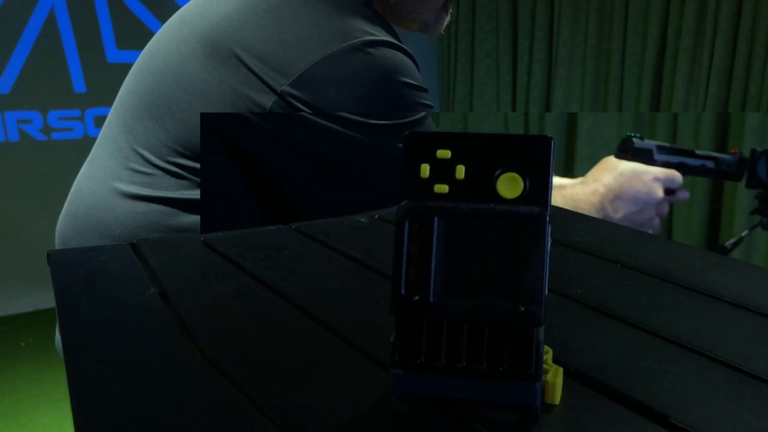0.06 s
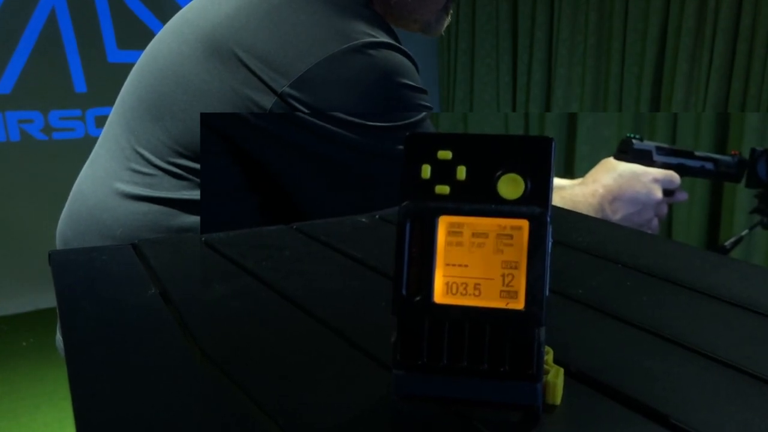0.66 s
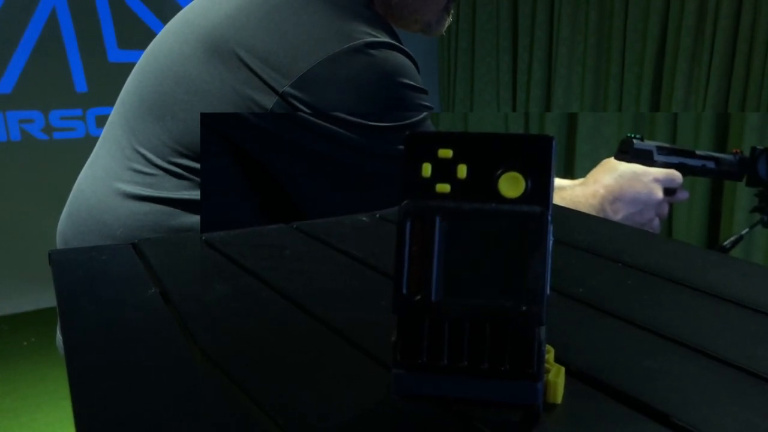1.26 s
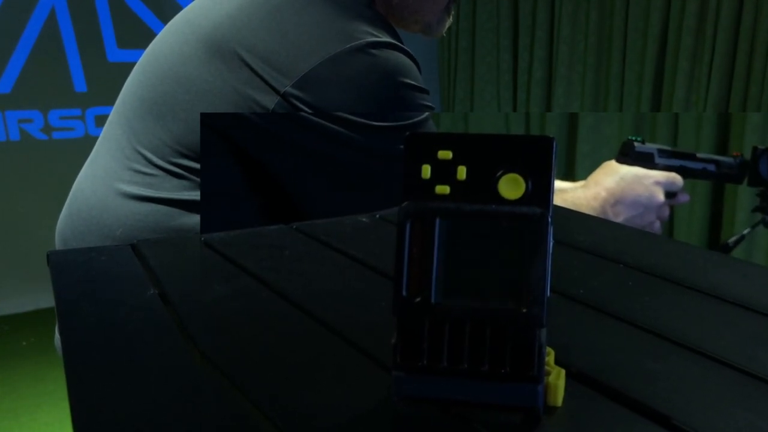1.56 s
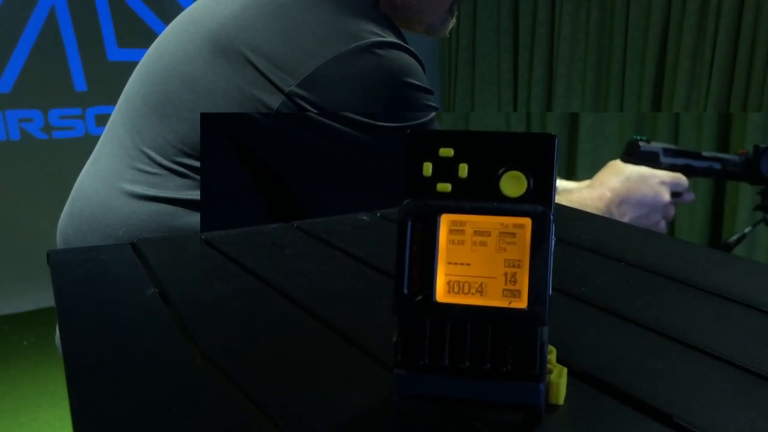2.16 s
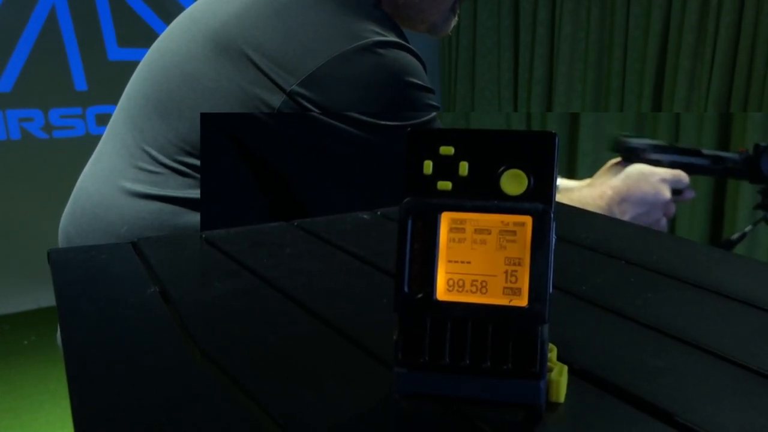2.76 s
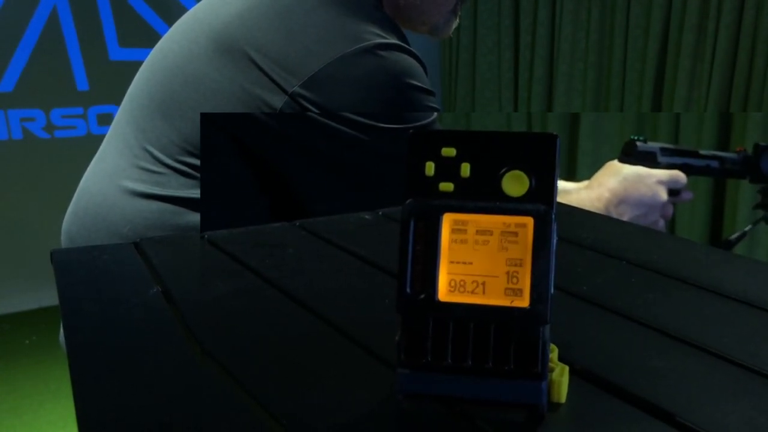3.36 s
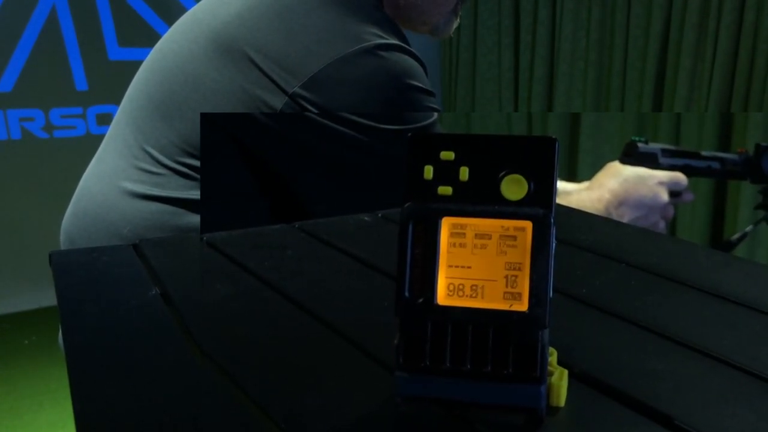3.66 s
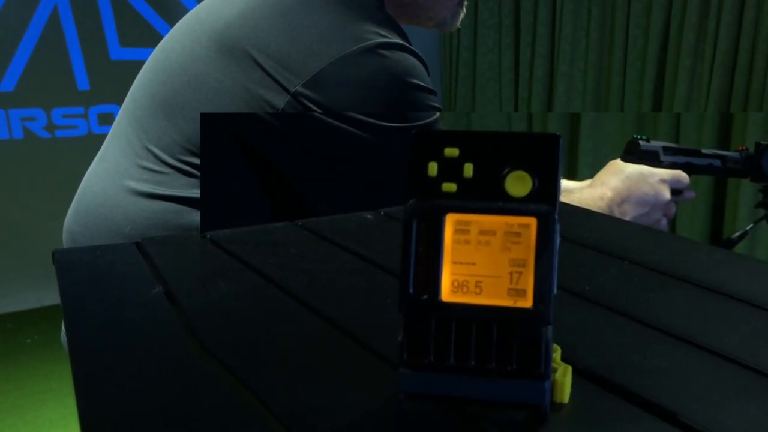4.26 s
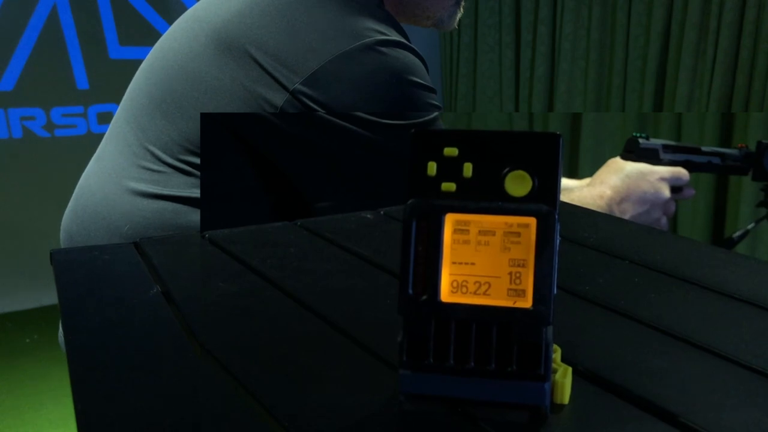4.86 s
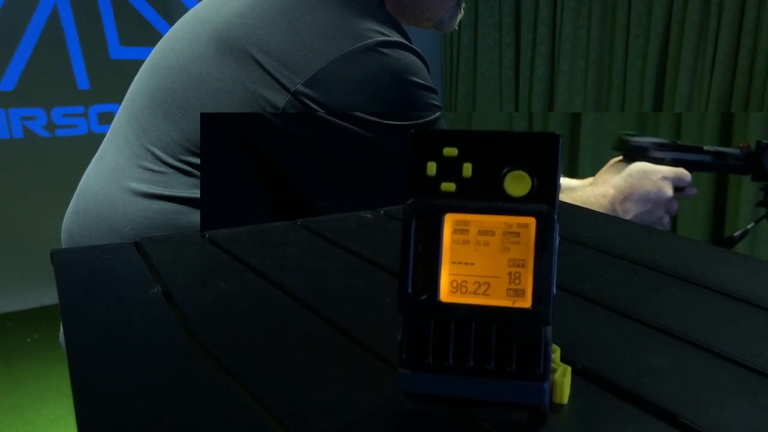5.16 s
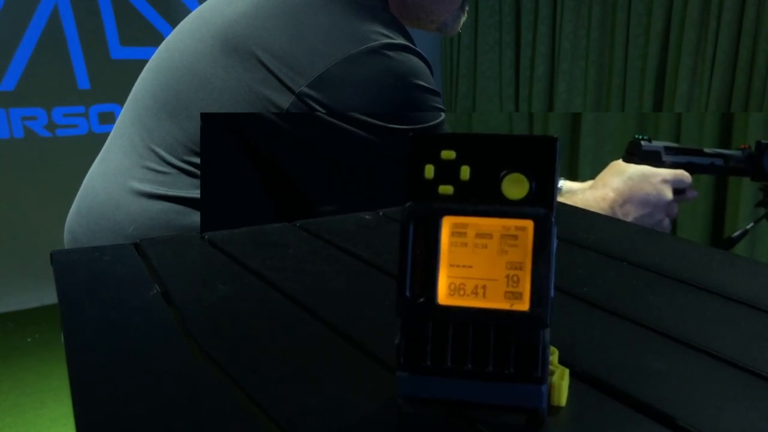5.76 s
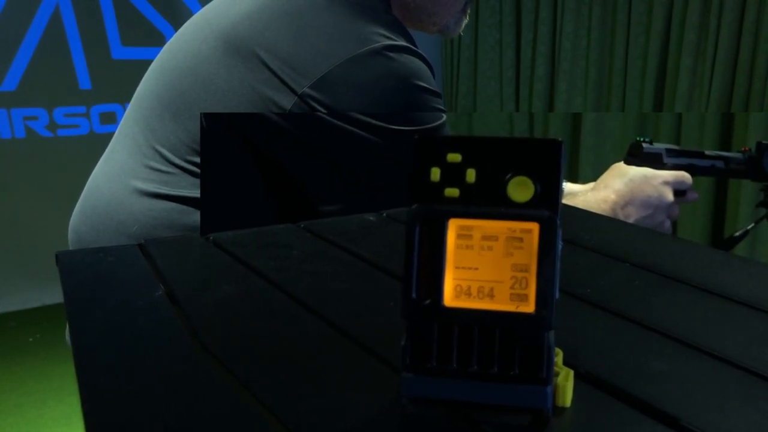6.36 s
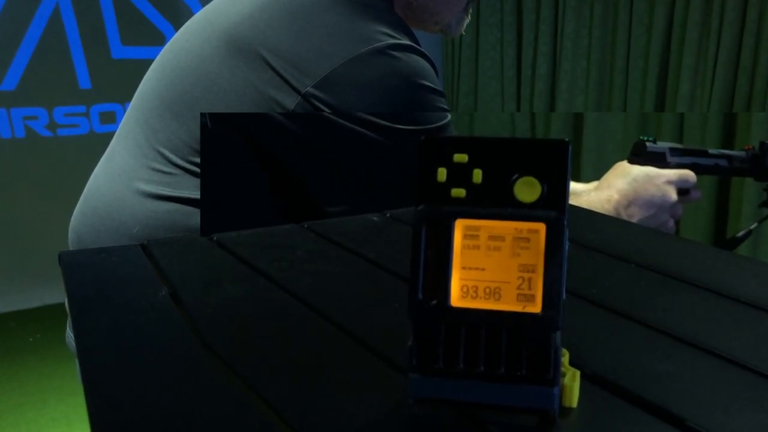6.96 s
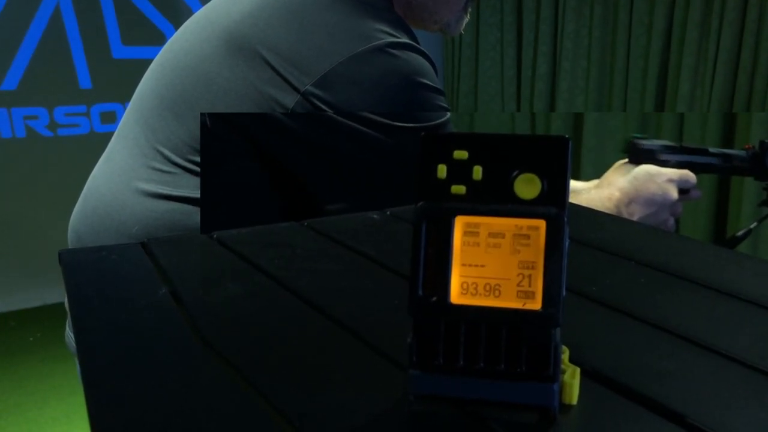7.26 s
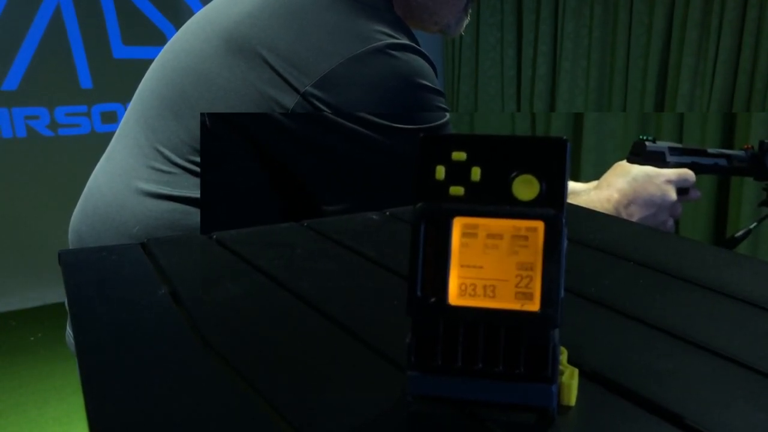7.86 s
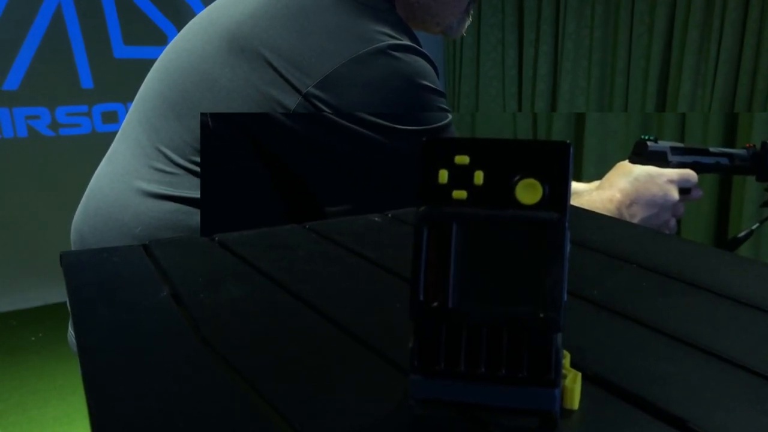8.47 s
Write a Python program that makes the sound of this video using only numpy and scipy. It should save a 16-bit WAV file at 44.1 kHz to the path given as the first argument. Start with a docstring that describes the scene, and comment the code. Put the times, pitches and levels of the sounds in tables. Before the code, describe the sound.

A gas airsoft pistol fires twelve single shots close by in an indoor range, over faint ventilation hum. A soft echo is dying away at the very start. Shots come at about 0.1, 0.8, 1.4, 2.1, 2.8, 3.5, 4.3, 5.2, 5.8, 6.6, 7.3 and 8.1 seconds. Each is a sharp pop with a short gas hiss and the quick clack of the slide slamming shut, followed by a low boom and roughly half a second of echo. A faint trigger creak precedes the shots, growing more noticeable later, while the whoosh of gas gradually weakens. The first pellet rings a metal target at 0.2 seconds. Spent pellets tick and skitter brightly between 1 and 1.8 seconds and again near 6 and 6.9. Dull knocks on distant boards come around 0.4 and 6.8 seconds, with fainter ones near 1.3, 1.9 and 7.6.

```python
"""A gas blowback airsoft pistol fires twelve shots down an indoor range.
At first, ventilation hums and an earlier shot's echo fades. Before each shot the trigger creaks. Then
the hammer falls, the valve cracks open, gas blasts from the muzzle and hisses out as the slide flies
back, and the slide slams shut. The room booms and echoes, and spent pellets bounce about; the first
one rings a metal target. Shot by shot the magazine cools, so less gas vents and the slide slows."""
import sys
import numpy as np
from scipy import signal
from scipy.fft import rfft, irfft
from scipy.io import wavfile
from scipy.ndimage import uniform_filter1d, minimum_filter1d

SR = 44100
rng = np.random.default_rng(int(sys.argv[2]) if len(sys.argv) > 2 else 0)


def pcm_store(signal):
    """Save signal as 16-bit PCM."""
    levels = np.round(np.clip(np.atleast_2d(signal), -1, 1) * 32767)
    wavfile.write(sys.argv[1], SR, levels.astype(np.int16).T)


N = 379701


def undb(db):
    """Turn decibels into a gain to multiply by."""
    return 10 ** (np.asarray(db) / 20)


def unit(x):
    """Scale a sound so that its total energy is 1."""
    return x / np.sqrt(np.sum(x ** 2))


def seconds(length):
    """The time of each sample, in seconds."""
    return np.arange(int(length * SR)) / SR


def fade(t, t60):
    """A smooth dying away; t60 is the fade time, the seconds it takes to drop 60 dB."""
    return np.exp(-np.log(1000) * t / t60)


def add(track, s, sound):
    """Mix a sound into the track at s seconds."""
    i = max(int(s * SR), 0)
    track[i:i + len(sound)] += sound[:max(N - i, 0)]


def through(x, response):
    """Pass a sound through a filter or room, given as its response to one click."""
    return signal.fftconvolve(x, response)[:len(x)]


def colour(points, size=4096):
    """The click response of a filter that follows the given (pitch, level) points."""
    hz, db = np.transpose(points)
    freqs = np.maximum(np.fft.rfftfreq(size, 1 / SR), 1)
    gains = undb(np.interp(np.log(freqs), np.log(hz), db))
    cepstrum = irfft(np.log(gains))
    cepstrum[1:size // 2] *= 2  # fold it so that nothing sounds before the click
    cepstrum[size // 2 + 1:] = 0
    return unit(irfft(np.exp(rfft(cepstrum))))


def burst(envelope, passes=3):
    """A puff of noise, even from bass to treble, whose loudness follows the envelope."""
    x = rng.standard_normal(len(envelope)) * envelope
    for _ in range(passes):
        x = irfft(np.exp(1j * np.angle(rfft(x))), len(x))  # make all pitches equally strong
        power = np.maximum(uniform_filter1d(x ** 2, size=128), 1e-18)
        x = x * envelope / np.sqrt(power)
    return unit(x)


def snap(t60):
    """A puff of noise that starts at once and dies away."""
    return burst(fade(seconds(.1), t60))


def ring(tones, t):
    """An object rings with fading tones, neighbours swinging in opposite directions."""
    return unit(sum((-1) ** k * undb(db) * unit(np.sin(2 * np.pi * hz * t) * fade(t, t60))
                    for k, (hz, db, t60) in enumerate(tones)))


def strike(tones, crack_t60, crack_db):
    """A blow rings a part, a little differently each time, while the contact chatters in a crack."""
    crack = snap(crack_t60)
    struck = np.array(tones)
    struck[:, 1] += 2 * rng.standard_normal(len(tones))  # vary each tone's level
    ringing = ring(struck, np.arange(len(crack)) / SR)
    return unit(ringing + undb(crack_db) * crack)


def thin_bass(x, bass_hz=420):
    """Small parts give off little bass."""
    return signal.sosfilt(signal.butter(3, bass_hz, "high", fs=SR, output="sos"), x)


# tone colour of the moving air: (pitch [Hz], level [dB])
AIR_COLOUR = [(25, -9.5), (45, -5), (70, -7), (120, -8), (250, -15.5), (330, -18.5), (420, -17.5),
              (650, -27.5), (1200, -29.5), (2500, -30.5), (4700, -40.5), (7000, -44.5), (12000, -51.5),
              (16000, -65.5)]
# steady tones of the fan: (pitch [Hz], level [dB])
FAN_TONES = [(64.6, -64), (237, -70.5), (420, -72)]
def ventilation(rush_db=-57.7):
    """Air rushes softly while a fan hums."""
    t = np.arange(N) / SR
    rush = undb(rush_db) * through(rng.standard_normal(N), colour(AIR_COLOUR))
    hum = sum(np.sqrt(2) * undb(db) * np.sin(2 * np.pi * (hz * t + rng.random()))
              for hz, db in FAN_TONES)
    return rush + hum


# tone colour of a shot's fading echo: (pitch [Hz], level [dB])
ECHO_COLOUR = [(100, 0), (400, 2), (1300, 0), (2500, -5), (5000, -6.5), (8000, -10), (16000, -28)]
def opening_echo(echo_db=-43, echo_t60=.5, rise_s=.015):
    """The hissing echo of an earlier shot dies away at the start."""
    t = np.arange(N) / SR
    hiss = through(rng.standard_normal(N), colour(ECHO_COLOUR))
    fade_in = np.minimum(t / rise_s, 1) ** 2
    return undb(echo_db) * hiss * fade(t, echo_t60) * fade_in


# the room's echo by band: (pitch [Hz], level [dB], fade time [s], late echo against that level [dB])
ECHO_BANDS = [(60, -1.5, .5, -22.5), (160, -3, .45, -24.5), (350, 1.5, .4, -26.5), (910, -2, 0.37, -20.5),
              (2050, 0.5, 0.41, -19), (3500, -0.5, 0.48, -26), (4700, -1, 0.46, -19),
              (6500, 1, 0.39, -31.5), (10500, -1.5, 0.33, -45.5), (15400, 9.5, 0.22, -58)]
def wall_echoes(x, first_s=.0115, hold_s=.014, late_t60=.91):
    """Echoes crowd in from the nearest wall on, hold briefly and die; the range's far end lingers."""
    t = seconds(.99)
    band_hz = np.transpose(ECHO_BANDS)[0]
    log_freqs = np.log(np.maximum(np.fft.rfftfreq(len(t), 1 / SR), 1))
    noise = rfft(rng.standard_normal(len(t)))
    tail = np.zeros(len(t))
    for this_band, (_, db, t60, late_db) in zip(np.eye(len(band_hz)), ECHO_BANDS):
        band = irfft(noise * np.interp(log_freqs, np.log(band_hz), this_band), len(t))
        early = fade(np.maximum(t - hold_s, 0), t60)
        late = undb(late_db) * fade(t, late_t60)
        tail += undb(db) * band * np.hypot(early, late)
    silence = np.zeros(int(first_s * SR))
    return through(x, np.r_[silence, unit(tail)])


# low notes that ring between the walls: (pitch [Hz], level [dB], fade time [s])
ROOM_NOTES = [(61, -11.5, 0.15), (82, -9, 0.5), (95.3, -11, 0.25), (142.5, -3, 0.39), (186.7, -0.5, 0.17),
              (335.3, 0.5, 0.34), (425, -2, 0.24), (488, 1.5, 0.26)]
# how strongly the hollow bench drums under the shots: (time [s], level [dB])
BENCH_LEVELS = [(0.14, -8), (1.1, -18), (2.8, 0), (5.8, 4.5), (8.1, 8.5)]
def boom(room_db=9, lag_s=.013, build_s=.018, bench_hz=153, bench_t60=.24):
    """Each blast sets off the room's low notes and the hollow bench; both take a moment to build."""
    out, t = np.zeros(N), seconds(.71)
    build = 1 - np.exp(-t / build_s)
    room = unit(ring(ROOM_NOTES, t) * build)
    bench = unit(ring([(bench_hz, 0, bench_t60)], t) * build)
    for s, charge_db, _ in PISTOL_SHOTS:
        bench_db = np.interp(s, *np.transpose(BENCH_LEVELS))
        add(out, s + lag_s, undb(charge_db) * (undb(room_db) * room + undb(bench_db) * bench))
    return out


# pellets landing on hard surfaces: (time [s], level [dB])
PELLET_TICKS = [(0.0131, -42.5), (0.0762, -45.5), (0.5824, -53), (1.0046, -24.5), (1.0122, -24.5),
                (1.1599, -32), (1.5818, -19.5), (1.7544, -37), (6.0182, -33), (6.9147, -30), (7.0974, -46)]
# tone colour of a tick: (pitch [Hz], level [dB])
TICK_COLOUR = [(100, -32.5), (3000, -12), (7000, 0), (10000, -1.5), (13000, -7), (16000, -11)]
def pellet_ticks(gain_db=13, tick_t60=.023, skitter_db=-3, skitter_t60=.16, stray_db=-55.5):
    """Spent pellets tick brightly and skitter nearby; one faint stray bounce follows each shot."""
    out = np.zeros(N)
    strays = [(s + rng.uniform(.49, .84), rng.normal(stray_db, 6)) for s, *_ in PISTOL_SHOTS]
    for s, db in PELLET_TICKS + strays:
        bounce = snap(tick_t60) + undb(skitter_db) * snap(skitter_t60)
        add(out, s, undb(db + gain_db) * bounce)
    return through(out, colour(TICK_COLOUR))


# pellets hitting boards: (time [s], level [dB], pitch [Hz])
BOARD_HITS = [(0.391, -32, 920), (1.259, -41.5, 939), (1.926, -44.5, 824), (1.96, -43.5, 1195),
              (6.805, -33.5, 833), (6.916, -36.5, 726), (7.642, -43.5, 1760)]
# tone colour of a board: (multiple of its pitch [ratio], level [dB])
BOARD_COLOUR = [(0.048, -18.5), (0.351, -8), (0.651, -8), (1.001, -4), (1.249, -4.5), (1.7, -11.5),
                (2.6, -19), (8, -43)]
def board_knocks(gain_db=20, shudder_t60=.13, tap_db=-3, tap_t60=.015, ring_db=-3, ring_cycles=150):
    """Pellets knock dully on far boards: a short tap, then the board shudders and rings."""
    out = np.zeros(N)
    for s, db, hz in BOARD_HITS:
        blow = undb(tap_db) * snap(tap_t60) + snap(shudder_t60)
        knock = through(blow, colour(np.array(BOARD_COLOUR) * [hz, 1]))
        ringing = ring([(hz, 0, ring_cycles / hz)], seconds(.5))
        add(out, s, undb(db + gain_db) * knock)
        add(out, s, undb(db + gain_db + ring_db) * ringing)
    return out


# ringing of the metal target: (pitch [Hz], level [dB], fade time [s])
TARGET_TONES = [(1290, -8, .25), (1340, -6, 0.48), (1376, -3, 0.34)]
def metal_target(hit_s=.17, db=9.5):
    """The first pellet sets a metal target ringing."""
    out = np.zeros(N)
    add(out, hit_s, undb(db) * ring(TARGET_TONES, seconds(1)))
    return out


# tone colour of the trigger spring: (pitch [Hz], level [dB])
CREAK_COLOUR = [(100, -13), (1800, -14.5), (2900, -3.5), (3700, -7.5), (4600, -15), (9000, -29),
                (16000, -48.5)]
def trigger(first_db=-55, db_per_shot=2.76, first_lead_s=.096, lead_s_per_shot=-.0052):
    """The trigger spring creaks faintly, each time a little louder and closer to the shot."""
    out = np.zeros(N)
    for fired, (s, *_) in enumerate(PISTOL_SHOTS):
        lead_s = first_lead_s + lead_s_per_shot * fired
        add(out, s - lead_s, undb(first_db + db_per_shot * fired) * snap(t60=.12))
    return through(out, colour(CREAK_COLOUR))


# ringing of the slide, the pistol's moving top: (pitch [Hz], level [dB], fade time [s])
SLIDE_TONES = [(1110, -9.5, 0.034), (2410, -3, 0.017), (3460, -9, 0.0072), (5470, -8.5, .014),
               (6770, -1, 0.026), (7550, -1.5, 0.021), (8400, -3.5, 0.0073), (10300, -3, .007),
               (11030, 2, 0.007), (14000, -19.5, .004)]
def slide(stop_db=4, stop_share=.46, slam_gain_db=21, first_cycle_s=.0565, cycle_s_per_shot=.0011):
    """The slide hits its rear stop and a spring slams it shut, later as the magazine cools."""
    out = np.zeros(N)
    for fired, (s, _, slam_db) in enumerate(PISTOL_SHOTS):
        cycle_s = first_cycle_s + cycle_s_per_shot * fired
        stop = strike(SLIDE_TONES, crack_t60=.014, crack_db=0)
        slam = strike(SLIDE_TONES, crack_t60=.027, crack_db=-1.2)
        add(out, s + stop_share * cycle_s, undb(stop_db) * stop)
        add(out, s + cycle_s, undb(slam_db + slam_gain_db) * slam)
    return thin_bass(out)


# the bright and the low part of the escaping gas: (pitch [Hz], level [dB])
HISS_COLOUR = [(25, -25.5), (300, -8), (900, 0), (1500, -1.5), (2800, 3), (5000, -3.5), (7000, -5.5),
               (8700, -3.5), (11300, -2.5), (12500, -6.5), (16000, -19)]
WHOOSH_COLOUR = [(25, -29), (100, -11.5), (250, -3), (450, -4), (700, -4), (1200, -11), (4000, -27.5)]
def venting_gas(lag_s=.012, hiss_db=15, hiss_db_per_shot=-.1545, hiss_swell_s=.021,
                whoosh_db=16.5, whoosh_db_per_shot=-.94, whoosh_swell_s=.013):
    """Gas swells out of the open slide with a hiss and a whoosh, weaker as the magazine cools."""
    hiss, whoosh = np.zeros((2, N))
    t = seconds(.15)
    for fired, (s, charge_db, _) in enumerate(PISTOL_SHOTS):
        hiss_gain = undb(hiss_db + charge_db + hiss_db_per_shot * fired)
        whoosh_gain = undb(whoosh_db + charge_db + whoosh_db_per_shot * fired)
        add(hiss, s + lag_s, hiss_gain * burst(t * np.exp(-t / hiss_swell_s)))
        add(whoosh, s + lag_s, whoosh_gain * burst(t * np.exp(-t / whoosh_swell_s)))
    return through(hiss, colour(HISS_COLOUR)) + through(whoosh, colour(WHOOSH_COLOUR))


# ringing of the frame and barrel, and of the gas valve: (pitch [Hz], level [dB], fade time [s])
FRAME_TONES = [(580, -10, 0.0048), (766, -0.5, 0.033), (1680, -3, 0.019), (2960, 0, 0.021),
               (3240, -4.5, 0.015), (3580, -6, 0.053), (3880, -5, 0.035), (4280, -2, 0.017)]
VALVE_TONES = [(6430, 3, 0.014), (7180, -1, 0.011), (7550, -14, 0.011), (11000, -12.5, 0.0018)]
def hammer_and_valve(catch_db=-5, catch_lead_s=.0023, hammer_db=12, valve_db=6, valve_lag_s=.0018):
    """A catch slips, the hammer falls and the gas valve cracks open."""
    out = np.zeros(N)
    for s, charge_db, _ in PISTOL_SHOTS:
        catch = strike(FRAME_TONES[2:], crack_t60=.025, crack_db=0)
        hammer = strike(FRAME_TONES, crack_t60=.046, crack_db=-1.3)
        valve = strike(VALVE_TONES, crack_t60=.024, crack_db=-1.1)
        add(out, s - catch_lead_s, undb(catch_db) * catch)
        add(out, s, undb(hammer_db) * hammer)
        add(out, s + valve_lag_s, undb(valve_db + charge_db) * valve)
    return thin_bass(out)


# the shots, which all the pistol's parts follow: (time [s], gas charge [dB], slide slam [dB])
PISTOL_SHOTS = [(0.1371, 1, -10), (0.8016, 1.5, -16), (1.4035, 1.8, -11.5), (2.0975, 0.5, -4.5),
                (2.77, 0, -10), (3.4618, -0.5, -10.5), (4.3305, 0, -9), (5.1739, -0.5, -10),
                (5.8203, 0.5, -12.5), (6.5891, 0.6, -9), (7.2781, 0, -10), (8.1321, 0.5, -10)]
# tone colour of the blast: (pitch [Hz], level [dB])
BLAST_COLOUR = [(25, -25.5), (90, -9), (200, -1.5), (400, -2), (750, 4.5), (1100, 2), (1450, -9),
                (2100, -6), (2900, -5), (4600, -1), (7000, -6.5), (9000, -12.5), (11500, -10.5),
                (16000, -32)]
def muzzle_blast(blast_db=24, jet_t60=.04):
    """A brief jet of gas bursts from the muzzle at each shot."""
    out = np.zeros(N)
    for s, charge_db, _ in PISTOL_SHOTS:
        add(out, s, undb(blast_db + charge_db) * snap(jet_t60))
    return through(out, colour(BLAST_COLOUR))


def scene(side_s=.0072, side_db=-7, wall_s=.0128, wall_db=-8):
    """The muzzle points away, so its blast arrives by the walls; the rest is heard directly too."""
    firing, cycling = hammer_and_valve(), slide()
    ticks, knocks = pellet_ticks(), board_knocks()
    blast, vent = muzzle_blast(), venting_gas()
    clatter = firing + cycling
    close = clatter + undb(-1) * vent + ticks + knocks + trigger() + metal_target()
    add(close, side_s, undb(side_db) * clatter)  # one close reflection
    add(close, wall_s, undb(wall_db) * blast)  # the nearest wall slaps the blast back
    into_room = blast + undb(-2) * firing + undb(-4) * cycling + vent + ticks + undb(-1) * knocks
    return (close + wall_echoes(into_room) + boom() + opening_echo() + ventilation())[None]


def record(dry, mic_hz=14200, limit_db=-10.5, top_hz=15700):
    """The microphone softens the treble, a fast limiter turns loud moments down and the top is cut."""
    heard = signal.sosfilt(signal.butter(2, mic_hz, fs=SR, output="sos"), dry)
    power = np.maximum(uniform_filter1d(heard ** 2, size=176), 1e-12)
    gain = np.minimum(1, undb(limit_db) / np.sqrt(power))
    smooth_gain = uniform_filter1d(minimum_filter1d(gain, size=300), size=300)
    rounded = np.tanh(heard * smooth_gain)  # round off the sharpest peaks
    return signal.sosfilt(signal.ellip(10, .2, 80, top_hz, fs=SR, output="sos"), rounded)


dry = scene()
out = record(dry)
pcm_store(out)
```